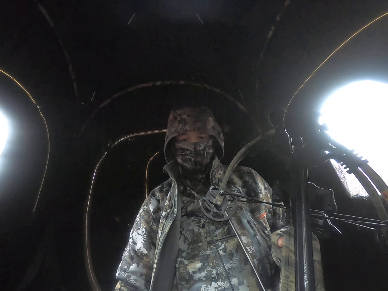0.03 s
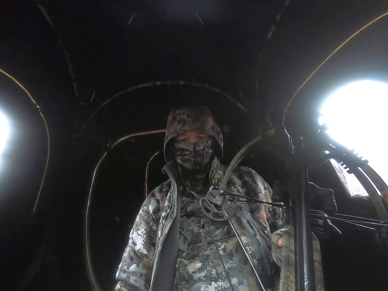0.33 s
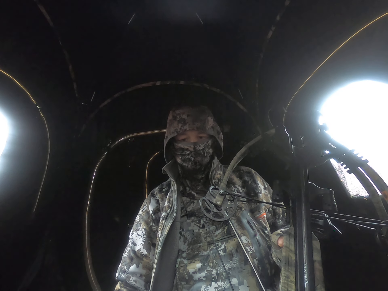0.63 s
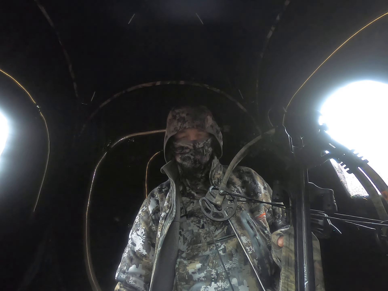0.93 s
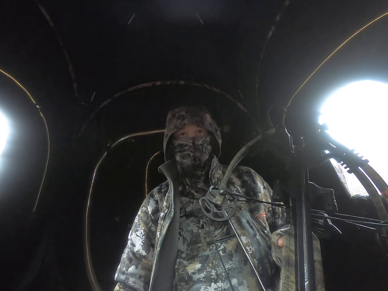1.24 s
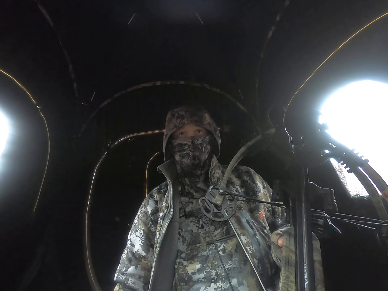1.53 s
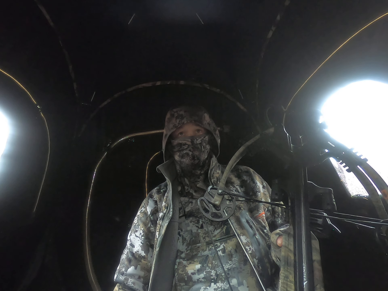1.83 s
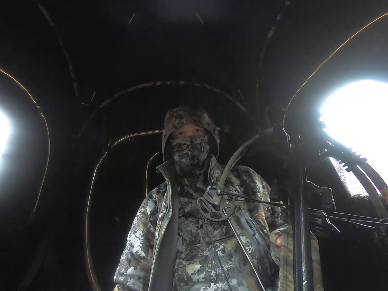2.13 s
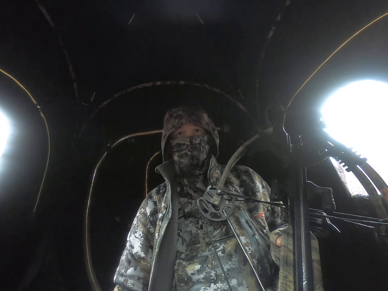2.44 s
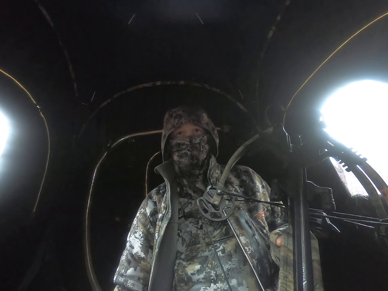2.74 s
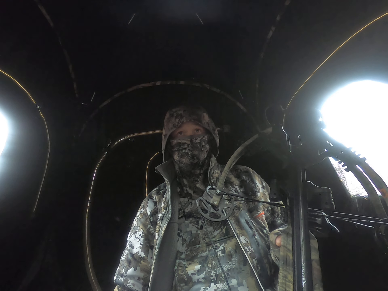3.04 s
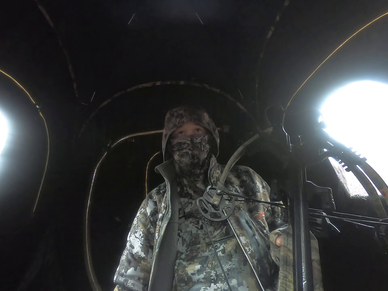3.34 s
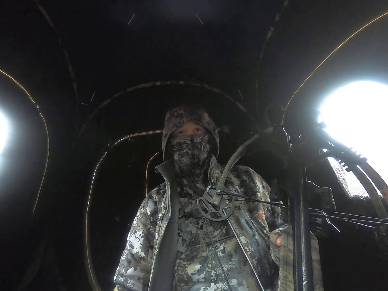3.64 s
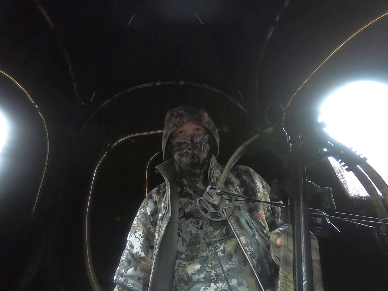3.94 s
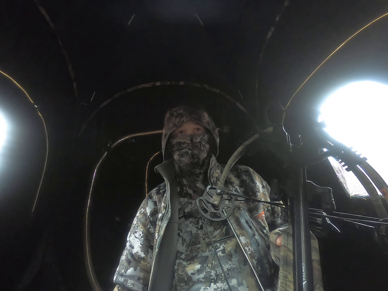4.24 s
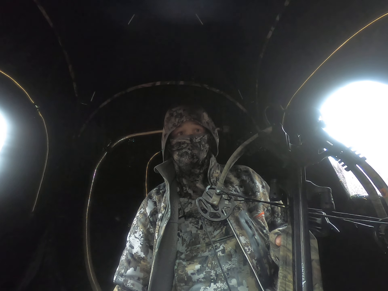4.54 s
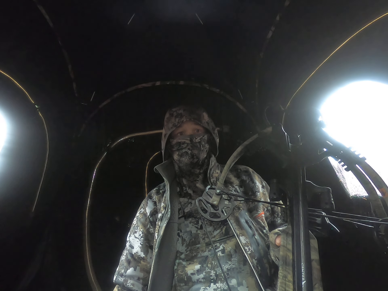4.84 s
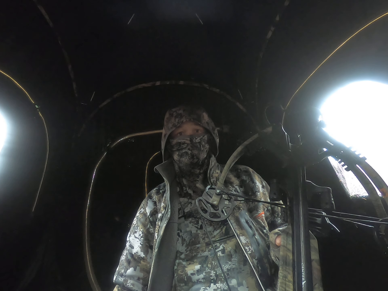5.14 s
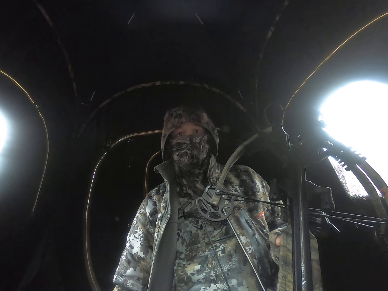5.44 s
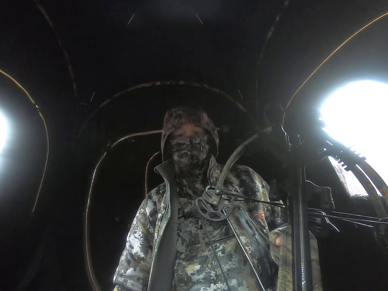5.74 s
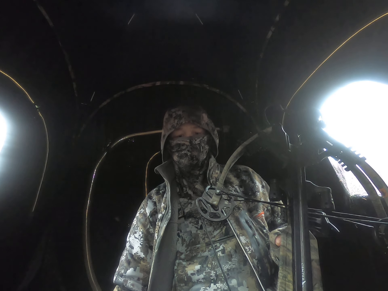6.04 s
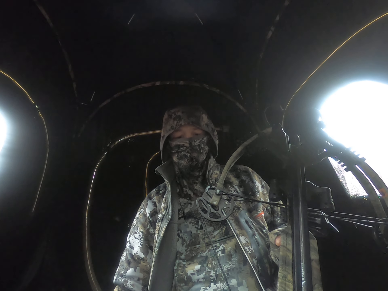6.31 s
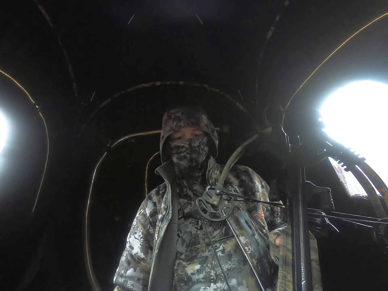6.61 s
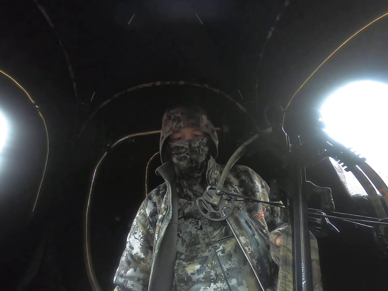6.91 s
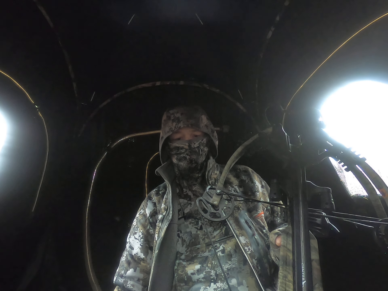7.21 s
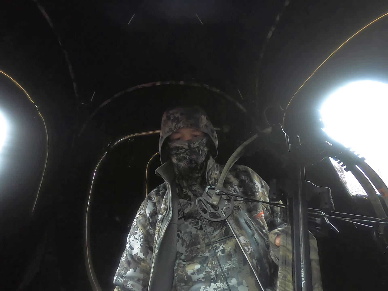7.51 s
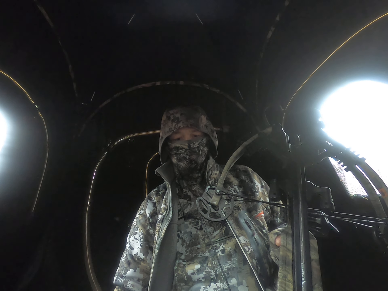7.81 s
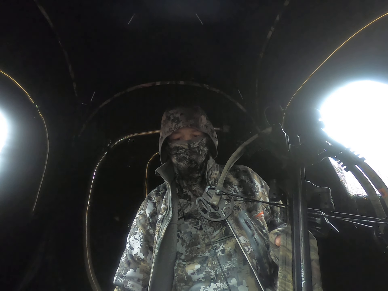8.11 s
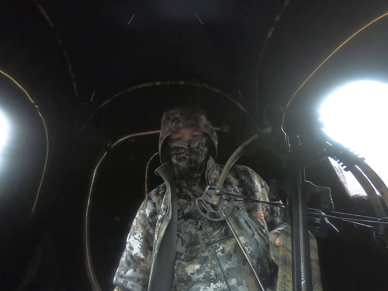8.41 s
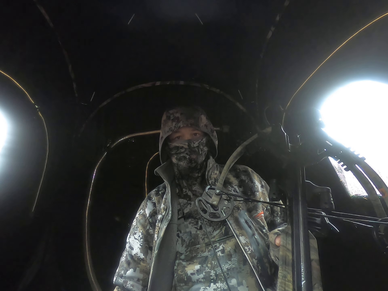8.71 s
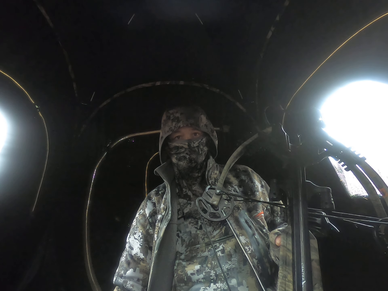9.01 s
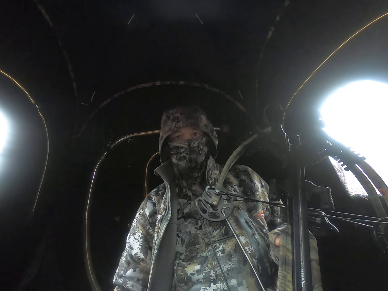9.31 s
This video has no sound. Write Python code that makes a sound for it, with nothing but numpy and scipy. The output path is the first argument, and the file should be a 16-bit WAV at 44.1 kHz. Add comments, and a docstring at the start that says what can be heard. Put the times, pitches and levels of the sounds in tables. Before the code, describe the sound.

Inside a cloth shelter in the woods, rain drums overhead, tree drips slap the roof and a brief gust heaves the walls.

```python
"""Steady rain on the taut fabric of a small hunting blind in the woods, heard from inside.
It fades in mono and dull: fine rain patters, big drips from the trees thump and slap the roof.
Around 2 s a gust heaves the walls and shakes down a shower of drips. Near 3 s the sound opens out
wide and bright, and lesser drips follow. At 4 s one sharp tap sounds close by; the drumming eases."""
import sys
import numpy as np
from scipy import signal
from scipy.fft import rfft, irfft, next_fast_len
from scipy.io import wavfile
from scipy.ndimage import uniform_filter1d, map_coordinates

SR = 44100
rng = np.random.default_rng(int(sys.argv[2]) if len(sys.argv) > 2 else 0)


def materialize(psi):
    """Save the field psi as 16-bit PCM at rate SR to the path in sys.argv[1].

    A 1-D psi becomes a single channel; in a 2-D psi each row is a channel.
    """
    bounded = np.clip(np.atleast_2d(psi).T, -1, 1)
    quanta = np.round(bounded * 32767).astype(np.int16)
    wavfile.write(sys.argv[1], SR, quanta)


N = 412776


def amp(db):
    """Decibels to gain."""
    return 10 ** (np.asarray(db) / 20)


def unit_rms(x):
    """Scale to rms 1."""
    return x / np.sqrt(np.mean(x ** 2) + 1e-20)


def at_hz(points, hz):
    """Interpolate (f/Hz, value) points on a log axis."""
    f, values = np.transpose(points)
    return np.interp(np.log(hz + 1), np.log(f), values)


def curves(rows):
    """Per-sample curve for each column after t/s."""
    t_s, *columns = np.transpose(rows)
    return [np.interp(np.arange(N) / SR, t_s, column) for column in columns]


def wobble(rate_hz):
    """Smooth random curve, rate_hz knots a second."""
    knots = rng.standard_normal(int(N * rate_hz / SR) + 4)
    return map_coordinates(knots, [np.arange(N) * rate_hz / SR])


def filtered(x, response):
    """Apply a complex frequency response."""
    size = next_fast_len(N + SR // 2)
    return irfft(rfft(x, size) * response(np.fft.rfftfreq(size, 1 / SR)), size)[..., :N]


def left_right(mid, side):
    """Mid/side to stereo."""
    return np.array([mid + side, mid - side])


# diffuse sound, left-right likeness: f/Hz, coherence
COHERENCE = [(100, 0.58), (290, 0.49), (640, 0.39), (1400, 0.033), (3100, 0.47), (6800, 0.016)]
def diffuse_noise(spectrum, patchy_db):
    """Stereo noise of rms 1 with patches of random gain, most coherent in the bass."""
    def response(hz):
        angle = np.arccos(np.clip(at_hz(COHERENCE, hz), -1, 1)) / 2
        return amp(at_hz(spectrum, hz)) * np.array([np.cos(angle), np.sin(angle)])
    bins = signal.stft(rng.standard_normal((2, N)), nperseg=256)[2]
    patches = uniform_filter1d(rng.standard_normal(bins.shape[1:]), size=12, axis=0)
    patches = uniform_filter1d(patches, size=5, axis=1)
    pair = signal.istft(bins * amp(patchy_db * unit_rms(patches)), nperseg=256)[1][:, :N]
    return unit_rms(left_right(*filtered(pair, response)))


# rain strength: t/s, drumming level/dB, patter level/dB
RAIN_LEVELS = [(0.38, -47.5, -51.5), (0.43, -49.5, -51.5), (0.98, -47.5, -50), (1.4, -49, -50.5),
               (1.85, -41, -43), (2.3, -43.5, -46), (2.55, -36.5, -42.5), (3.25, -43, -47.5),
               (3.63, -51.5, -50.5), (4.35, -51, -51), (4.65, -48, -50.5), (5.13, -49.5, -48.5),
               (5.4, -52.5, -51.5), (6.9, -54.5, -50.5), (7.65, -58, -54), (8.9, -56, -48.5),
               (9.12, -52, -48), (9.35, -58.5, -48.5)]
# roof drumming: f/Hz, level/dB
ROOF_SPECTRUM = [(70, -13.5), (115, -6), (160, 4), (205, 0), (290, -2.5), (440, -8.5), (570, -3.5),
                 (730, 1), (940, -17), (1300, -5.5), (2000, -42)]
# leaf hiss: f/Hz, level/dB
LEAF_SPECTRUM = [(500, -20), (800, -7), (1000, -10), (1400, -4), (1950, -6.5), (2900, -6), (4400, -13.5),
                 (5600, -6.5), (7200, -6), (9700, -11.5), (11300, -29), (14400, -35), (16000, -64)]
def rain_wash():
    """Countless far drops merge into a drumming on the roof and a hiss in the leaves."""
    drum_db, patter_db = curves(RAIN_LEVELS)
    roof = amp(drum_db - 1.5 + 0.97 * wobble(12)) * diffuse_noise(ROOF_SPECTRUM, patchy_db=3.0)
    leaves = amp(patter_db - 0.6 + 0.79 * wobble(10)) * diffuse_noise(LEAF_SPECTRUM, patchy_db=1.5)
    return roof + leaves * amp([[-.6], [.6]])


def impact_axes(size=384):
    """Axes of one impact: t/s (zero a quarter of the way in), f/Hz."""
    return (np.arange(size) - size // 4) / SR, np.fft.rfftfreq(size, 1 / SR)


def unit_impact(shapes):
    """Scale each impact to the energy of 5 ms at rms 1."""
    return shapes / np.sqrt(np.sum(shapes ** 2, -1, keepdims=True) / (.005 * SR) + 1e-20)


def thump(hz, decay_cycles, stereo_skew):
    """Cloth is pushed in and springs back at its local pitch, left and right a little out of step."""
    t, _ = impact_axes()
    cycles = hz[:, None] * t
    age = np.maximum(cycles / decay_cycles + 2, 0)
    start, skew = rng.standard_normal((len(hz), 2)).T[:, :, None]
    shift_rad = stereo_skew * np.tanh(2 * skew) * (hz[:, None] / 500) ** 2.46
    phase_rad = 2 * np.pi * cycles + start / 2 + np.array([shift_rad, -shift_rad])
    swing = age ** 2 * np.exp(-age) * np.sin(phase_rad) * signal.windows.tukey(len(t), .3)
    return unit_impact(np.gradient(swing, axis=-1))  # air follows the cloth's speed


def burst(count, colour, decay_s, lead_s, coherence, snap=0.78):
    """Water bursts on impact: one clean snap, then a short crackle, partly different left and right."""
    t, hz = impact_axes()
    noise = rng.standard_normal((count, 3, len(t))).transpose(1, 0, 2)
    pair = np.sqrt(coherence) * noise[0] + np.sqrt(1 - coherence) * noise[1:]
    envelope = (t > -lead_s) * np.exp(-np.maximum(t + lead_s, 0) / decay_s)
    contact = np.arange(len(t)) == np.argmax(envelope)
    force = pair * envelope / np.linalg.norm(envelope) - snap * contact
    return unit_impact(irfft(rfft(force) * colour(hz)))


def slap_colour(centre_hz, width_oct, edge_hz=4300, ring_hz=3700, ring_db=3):
    """Broad hump at each drop's pitch; taut cloth adds a bright ring just below the roll-off."""
    def colour(hz):
        offset = np.log2((hz + 1) / centre_hz[:, None]) / width_oct
        hump = 1 / (1 + np.where(offset < 0, 2 * offset ** 4, 1.08 * offset ** 2))
        ring = amp(ring_db * np.exp(-((hz - ring_hz) / 600) ** 2))
        return hump * ring / np.sqrt(1 + (hz / edge_hz) ** 12)
    return colour


# fine spray: f/Hz, level/dB
SPRAY_SPECTRUM = [(1500, -9), (4000, -11), (7000, 1), (9800, -12), (11200, -26.5), (14500, -35),
                  (17000, -50)]
def spray_colour(hz):
    """Bright spectrum of the spray a drop throws off."""
    return amp(at_hz(SPRAY_SPECTRUM, hz))


def place(t_s, shapes, pan_db):
    """Lay impacts in stereo with a tiny random left-right lag; pan_db is left over right."""
    t, _ = impact_axes()
    lag_s = rng.normal(0, .00006, len(t_s))
    channels = []
    for side, shape in zip((1, -1), shapes):
        gain = np.sqrt(2 / (1 + amp(-2 * side * pan_db)))
        onset = np.round((t_s + side * lag_s) * SR)
        index = np.clip(onset[:, None] + np.round(t * SR), 0, N).astype(int)
        channels.append(np.bincount(index.ravel(), (shape * gain[:, None]).ravel(), N + 1)[:N])
    return np.array(channels)


def patter(count=1500):
    """Small drops land at random: most are faint, a few near, and heavier rain hits harder."""
    t_s = rng.uniform(0, (N - 1) / SR, count)
    drum_db, patter_db = (db[(t_s * SR).astype(int)] for db in curves(RAIN_LEVELS))
    size_db = 3.43 * np.minimum(rng.exponential(size=count), 2.6)
    pitch, softness, wetness, position = rng.standard_normal((4, count))
    ratio = np.exp(.35 * pitch)
    thumps = thump(420 * ratio, decay_cycles=0.37, stereo_skew=0.69)
    slaps = burst(count, slap_colour(1750 * ratio, width_oct=0.47),
                  decay_s=0.0011, lead_s=0.001, coherence=0.26, snap=0.42)
    spray = burst(count, spray_colour, decay_s=0.00087, lead_s=0.00091, coherence=0.1, snap=0.24)
    thumps *= amp(drum_db + size_db + 1.6 * softness - 9)[:, None]
    slaps *= amp(patter_db + size_db - 10.5)[:, None]
    spray *= amp(patter_db + size_db + 5.4 * wetness - 14)[:, None]
    return place(t_s, thumps, 1.9 * position - 1.5) + place(t_s, slaps + spray, 4 * position - 2.2)


# modes of the fabric panels and enclosed air: f/Hz, bandwidth/Hz, level/dB
PANEL_MODES = [(70, 39, -2), (115, 38, -16), (175, 30, 9), (215, 42, 4.5), (274, 38, -7.5), (368, 75, -15),
               (520, 135, 0.5), (633, 15, 7.5)]
def blind_resonance(hits, ring_delay_s=0.00339):
    """The panels ring briefly after each hit; the little cloth room adds a very short tail."""
    def panels(hz):
        modes = sum(amp(db) * 1j * hz * width_hz / (mode_hz ** 2 - hz ** 2 + 1j * hz * width_hz)
                    for mode_hz, width_hz, db in PANEL_MODES)
        return modes * np.exp(-2j * np.pi * hz * ring_delay_s)
    ring = filtered(hits.mean(0), panels)
    t = np.arange(SR // 8) / SR
    decay = (amp(-60 * t / 0.047) + 0.11 * amp(-60 * t / 0.28)) * (t > .0015)
    tail = np.zeros((2, N + len(t)))
    for block in np.array_split(np.arange(N), 24):  # new landing spots, new reflections
        echo = rng.standard_normal((2, len(t))) * decay
        echo /= np.linalg.norm(echo, axis=1, keepdims=True)
        wet = signal.fftconvolve(hits[:, block], echo, axes=1)
        tail[:, block[0]:block[0] + wet.shape[1]] += wet
    left, right = tail[:, :N]
    side = filtered((left - right) / 2, lambda hz: np.sqrt(1 - at_hz(COHERENCE, hz)))
    return hits + amp(-8.5) * ring + amp(-5.5) * left_right((left + right) / 2, side)


def drip_impacts(t_s, thump_db, thump_hz, slap_db, slap_hz, spray_db, pan_db):
    """Each drip thumps the cloth, slaps flat and throws off a fine spray."""
    thumps = thump(thump_hz, decay_cycles=0.2, stereo_skew=1.0)
    slaps = burst(len(t_s), slap_colour(slap_hz, width_oct=0.76),
                  decay_s=0.0011, lead_s=0.0007, coherence=0.53, snap=0.7)
    spray = burst(len(t_s), spray_colour, decay_s=0.0012, lead_s=0.0011, coherence=0.055, snap=0.37)
    thumps *= amp(thump_db)[:, None]
    slaps *= amp(slap_db)[:, None]
    spray *= amp(spray_db)[:, None]
    return place(t_s, thumps + slaps + spray, pan_db)


def droplets(t_s, slap_db, pan_db, count=5):
    """A drip breaks up as it lands: small droplets fall around it, most just after."""
    delay, size, pitch = rng.standard_normal((len(t_s) * count, 3)).T
    landing_s = np.repeat(t_s, count) + .01 + .011 * delay
    gain = amp(np.repeat(slap_db, count) - 16 + 0.95 * size)
    ticks = burst(len(landing_s), slap_colour(1800 * np.exp(0.74 * pitch), width_oct=0.36),
                  decay_s=0.0017, lead_s=0.000846, coherence=0.67)
    return place(landing_s, gain[:, None] * ticks, np.repeat(pan_db, count))


# drips on the roof: t/s, thump level/dB, thump f/Hz, slap level/dB, slap f/Hz, spray level/dB, pan/dB
BIG_DRIPS = [(0.4804, -39, 335, -43.5, 1550, -52, -11), (1.002, -32.5, 295, -62, 1450, -54, 6),
             (1.0446, -32.5, 277, -40, 2050, -43, -5), (1.368, -30, 316, -39.5, 1450, -38, 11),
             (1.4794, -42, 317, -38.5, 1850, -44, 2), (1.7027, -26, 400, -33, 1600, -39.5, 0),
             (1.7179, -31, 310, -33.5, 1550, -46, -7), (1.7937, -26.5, 290, -31.5, 2100, -49, 7),
             (1.8937, -37, 380, -37, 1450, -46, 0), (1.9766, -22, 306, -37.5, 1800, -38, -5),
             (1.9954, -31, 358, -41, 1900, -51, -2), (2.1502, -35, 357, -38, 1350, -40, 0),
             (2.3738, -29, 282, -32, 1900, -48, 12), (2.4192, -21.5, 269, -35, 1400, -52, 6),
             (2.4518, -24, 274, -35, 1450, -54, -11), (2.4665, -26, 430, -32, 1450, -41, -5),
             (2.4797, -21, 290, -32, 1400, -37, 14), (2.623, -30, 336, -37, 1500, -52, 20),
             (2.7275, -29, 328, -39, 1700, -42, 0), (2.8233, -28.5, 332, -38.5, 1850, -39, 1),
             (2.9803, -31.5, 342, -40, 1450, -54, 5), (3.1451, -29.5, 310, -36, 1800, -40, -1),
             (3.195, -32, 298, -35.5, 2100, -38.5, -5), (3.462, -41, 430, -43, 1500, -39, -1),
             (3.5325, -33.5, 356, -35.5, 1650, -55, -1), (3.7076, -34.5, 255, -46.5, 1300, -51, -1),
             (3.825, -36, 278, -37, 2650, -48, 4), (4.1444, -40.5, 310, -44, 1700, -46, -2),
             (4.2313, -41, 475, -39, 1600, -51, -26), (4.3581, -39.5, 550, -38.5, 1600, -44, -3),
             (4.861, -36, 387, -46.5, 1500, -56, -4), (4.9917, -39.5, 520, -36.5, 1600, -42, 2),
             (4.9997, -39, 452, -35, 1500, -36, -1), (5.22, -37.5, 410, -39, 1700, -53, -4),
             (5.2446, -34, 404, -36.5, 1600, -43, -2), (5.4883, -38.5, 292, -48, 2250, -40.5, -3),
             (5.5921, -35.5, 470, -48, 1350, -58, -2), (5.6309, -38, 358, -34, 1300, -42, -1.5),
             (5.7003, -32, 338, -34.5, 1450, -44, 0), (5.9197, -42, 415, -37.5, 1300, -49, 3),
             (5.9395, -51, 580, -39, 2600, -33.5, 4), (6.0243, -38, 420, -31.5, 2750, -39, 2),
             (6.052, -38.5, 423, -53, 1500, -55, -10), (6.119, -57, 453, -43, 1800, -48, 1),
             (6.2522, -47.5, 415, -40.5, 1600, -43, -5), (6.441, -39.5, 560, -42, 1750, -40, -6),
             (6.651, -40, 483, -49, 1550, -46, -13), (6.734, -43.5, 580, -42, 1550, -47, -14),
             (6.9644, -34, 490, -40.5, 1400, -52, -3), (7.1127, -34.5, 470, -40, 1250, -47, -1.5),
             (7.309, -46, 650, -47, 1150, -56, -13), (7.7013, -44, 550, -35.5, 1400, -38, -1),
             (8.041, -47, 480, -40.5, 1750, -41, 0), (8.0943, -43, 332, -46.5, 1550, -56, -3),
             (8.4116, -33, 610, -32, 1300, -36, -12), (8.464, -43, 520, -41, 1400, -44, -2),
             (8.7629, -44, 475, -39, 1650, -43, -1), (8.8869, -45, 484, -38.5, 1500, -46, -1),
             (8.971, -52, 440, -36.5, 1650, -42, 8), (9.0971, -42.5, 459, -40.5, 2100, -40.5, -2),
             (9.163, -36, 550, -35, 1450, -42, -5)]
def big_drips():
    """The biggest drips from the trees stand out from the rain and break into droplets."""
    t_s, thump_db, thump_hz, slap_db, slap_hz, spray_db, pan_db = np.transpose(BIG_DRIPS)
    impacts = drip_impacts(t_s, thump_db, thump_hz, slap_db, slap_hz, spray_db, pan_db)
    return impacts + droplets(t_s, slap_db, pan_db)


# gusts: peak t/s, level/dB, half length/s
WIND_GUSTS = [(1.05, -55, 0.38), (2.25, -43, 0.42), (4.253, -56.5, 0.38), (5.4, -70, 0.68)]
# heaving walls: f/Hz, level/dB
HEAVE_SPECTRUM = [(15, -3), (32, -9), (60, -0.5), (100, -5.5), (160, -41), (400, -68)]
# slack walls bellying: t/s, level/dB, f/Hz
WALL_BUMPS = [(2.0, -42, 46), (2.2, -45, 43), (2.461, -34, 50), (4.142, -42, 55), (4.372, -41, 37.8)]
def wind(calm_db=-65):
    """Gusts heave the walls with a low, lumpy rumble; a slack wall bellies with a soft bump."""
    t = np.arange(N) / SR
    gusts = sum(amp(db) * np.exp(-((t - peak_s) / half_s) ** 2) for peak_s, db, half_s in WIND_GUSTS)
    strength = (amp(calm_db) + gusts) * amp(-1.5 + 2.8 * wobble(11))
    bumps = np.zeros(N)
    for t_s, db, hz in WALL_BUMPS:
        near = np.abs(t - t_s) < .1
        cycles = (t[near] - t_s) * hz
        bumps[near] += amp(db) * np.cos(2 * np.pi * cycles) * np.exp(-(cycles / 0.61) ** 2)
    return bumps + strength * diffuse_noise(HEAVE_SPECTRUM, patchy_db=1.0)


def small_drips(t_s, thump_db, slap_db, spray_db, spread_db):
    """Drips that vary by chance in weight, flatness, wetness, pitch and position."""
    weight, flatness, wetness, pitch, position = rng.standard_normal((len(t_s), 5)).T
    ratio = np.exp(0.24 * pitch)
    return drip_impacts(t_s, thump_db=thump_db + spread_db * weight, thump_hz=470 * ratio,
                        slap_db=slap_db + spread_db * flatness, slap_hz=1700 * ratio,
                        spray_db=spray_db + spread_db * wetness, pan_db=4 * position - 3)


# clumps of drips: centre t/s, spread/s, slap level per drip/dB
BRANCH_SHOWERS = [(1.68, 0.028, -46), (1.783, 0.012, -43.5), (2.005, 0.02, -43), (2.345, 0.025, -43),
                  (2.49, 0.02, -42.5), (2.63, 0.037, -49), (3.87, 0.028, -48.5), (4.7, 0.058, -51.5),
                  (5.04, 0.04, -58), (5.905, 0.022, -49), (6.78, 0.025, -50.5), (8.05, 0.014, -58),
                  (8.455, 0.016, -54.5), (9.29, 0.027, -49.5)]
def branch_showers(count=14):
    """A swaying branch lets go of its water, which spatters on the roof in a short clump."""
    centre_s, spread_s, slap_db = np.repeat(BRANCH_SHOWERS, count, axis=0).T
    t_s = centre_s + spread_s * rng.standard_normal(len(centre_s))
    return small_drips(t_s, thump_db=slap_db - 2, slap_db=slap_db, spray_db=slap_db - 2.5, spread_db=1)


def lesser_drips(count=56, start_s=3.2):
    """Once shaken, the trees keep dripping at loose intervals, harder when the rain is heavier."""
    slots = np.arange(count) + rng.uniform(size=count)
    t_s = np.interp(slots, [0, count], [start_s, (N - 1) / SR])
    drum_db, patter_db = (db[(t_s * SR).astype(int)] for db in curves(RAIN_LEVELS))
    return small_drips(t_s, thump_db=drum_db + 5.5, slap_db=patter_db + 7,
                       spray_db=patter_db + 5.5, spread_db=1.4)


# sharp tap: f/Hz, level/dB
TAP_SPECTRUM = [(500, -25), (3000, -12.5), (6500, -3), (7500, 5), (10300, -3), (11800, -17), (14500, -19),
                (17000, -38)]
def tap(t_s=3.9988):
    """One hard, bright tick close by."""
    tick = burst(1, lambda hz: amp(at_hz(TAP_SPECTRUM, hz)),
                 decay_s=0.00044, lead_s=0.00033, coherence=0.16, snap=0.54)
    return place(np.array([t_s]), amp(-30.5) * tick, pan_db=np.array([4.0]))


def scene():
    """Rain on the blind, with the woods and the wind behind it."""
    hits = patter() + big_drips() + branch_showers() + lesser_drips() + tap()
    return rain_wash() + blind_resonance(hits) + wind()


# opening out: t/s, dullness/0-1, stereo width/0-1
OPENING_CURVE = [(0, 1, 0), (1.7, 1, 0), (2.45, 1, 0), (2.75, 0.83, 0.31), (3.0, 0.64, 0.53),
                 (3.5, 0.47, 0.77), (4.4, 0.42, 0.84)]
# bass widens later than treble: f/Hz, exponent on the width
WIDTH_EXPONENTS = [(250, 8), (650, 2), (1400, 1.1), (3000, 1.9), (5500, 0.37)]
# treble loss at full dullness: f/Hz, level/dB
TREBLE_LOSS = [(4450, 0), (5400, -16.5), (7000, -20.5), (9500, -19), (11500, -9), (15000, -11)]
# fade-in: t/s, level/dB
FADE_IN = [(0, -96.5), (.14, -69), (.19, -13), (.25, 1), (.3, 1.5)]
def record(dry, cutoff_hz=15800):
    """Fade in mono and dull, then open to brighter stereo; low-passed throughout."""
    hz, t_s, (left, right) = signal.stft(dry, SR, nperseg=256)
    knots_s, dullness, width = np.transpose(OPENING_CURVE)
    side_gain = np.interp(t_s, knots_s, width) ** at_hz(WIDTH_EXPONENTS, hz)[:, None]
    loss_db = at_hz(TREBLE_LOSS, hz)[:, None] * np.interp(t_s, knots_s, dullness)
    bins = left_right((left + right) / 2, side_gain * (left - right) / 2) * amp(loss_db)
    opened = signal.istft(bins, SR, nperseg=256)[1][:, :N]
    fade_db, = curves(FADE_IN)
    return filtered(opened * amp(fade_db), lambda hz: hz < cutoff_hz)


dry = scene()
out = record(dry)
materialize(out)
```